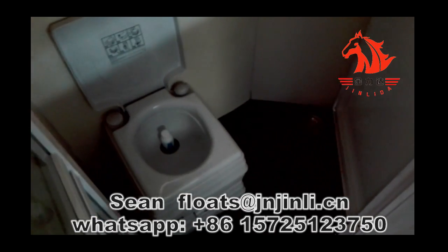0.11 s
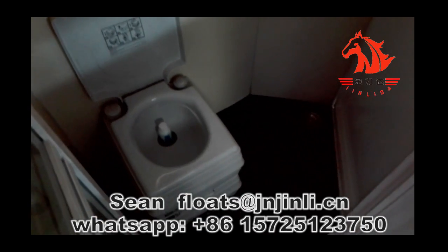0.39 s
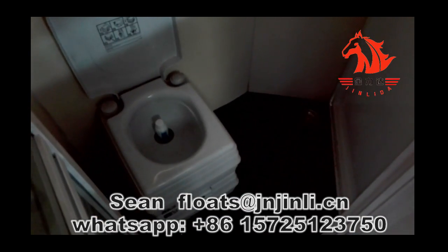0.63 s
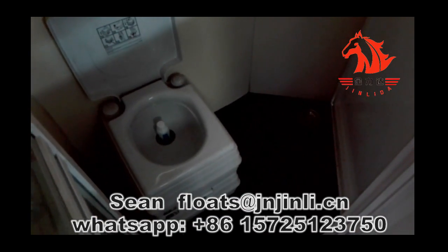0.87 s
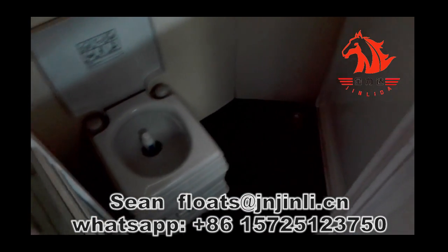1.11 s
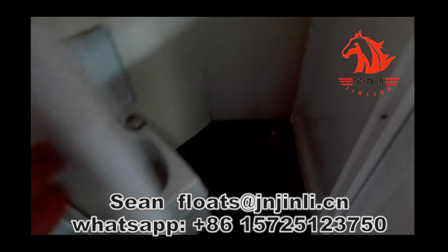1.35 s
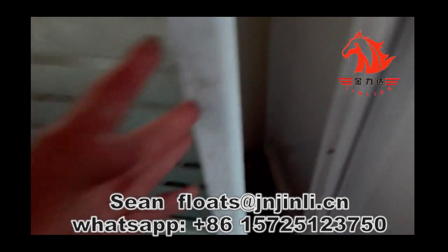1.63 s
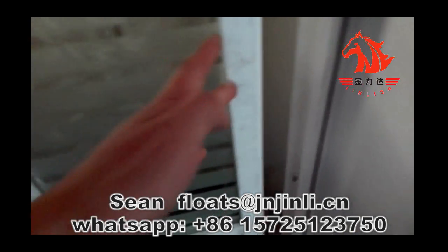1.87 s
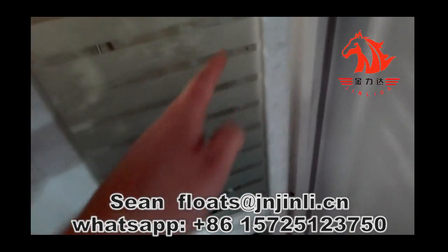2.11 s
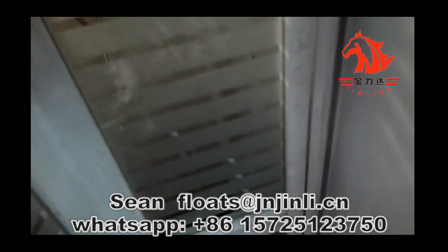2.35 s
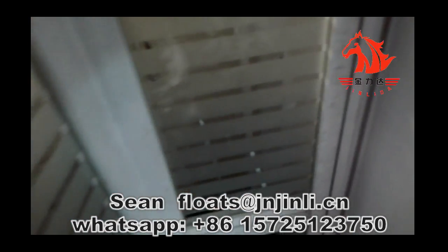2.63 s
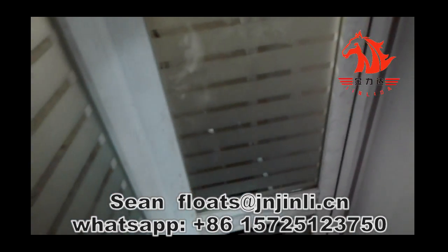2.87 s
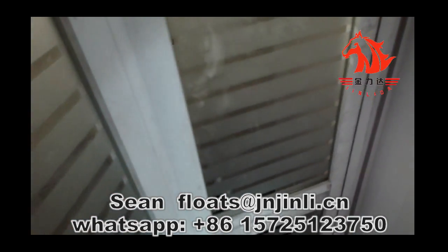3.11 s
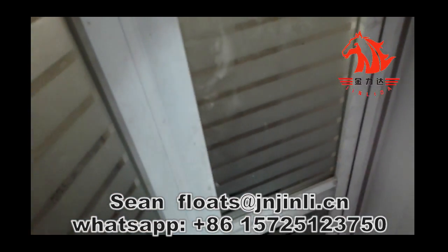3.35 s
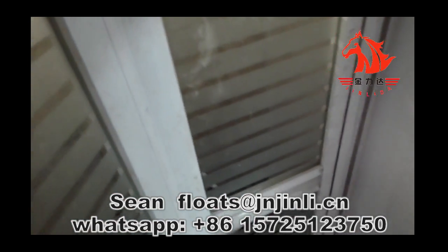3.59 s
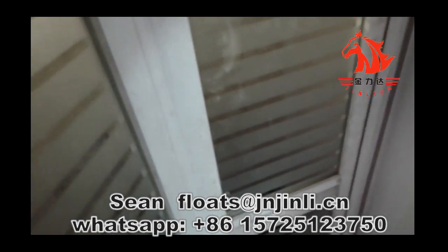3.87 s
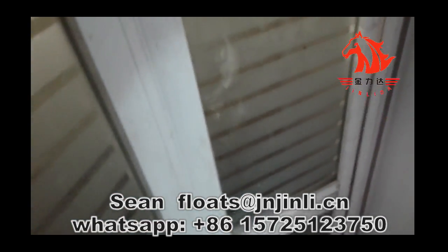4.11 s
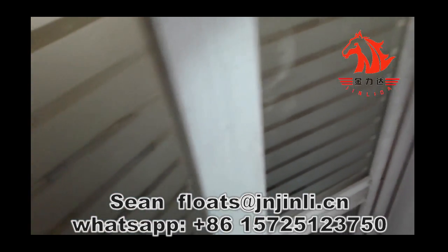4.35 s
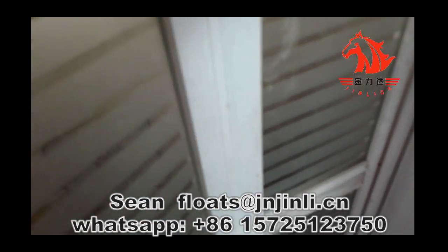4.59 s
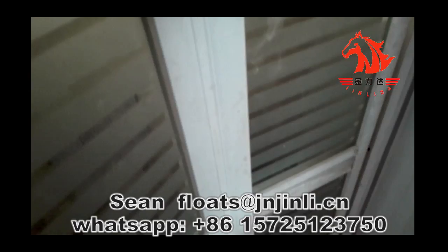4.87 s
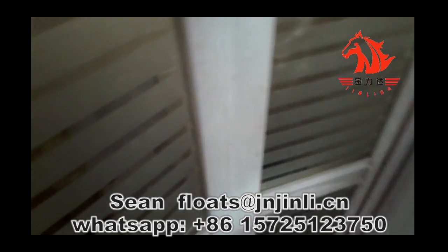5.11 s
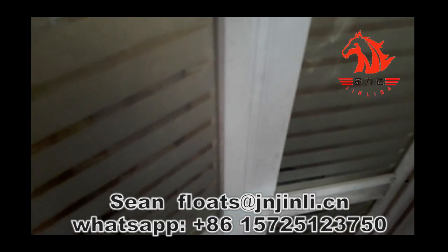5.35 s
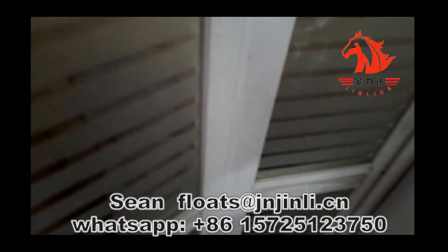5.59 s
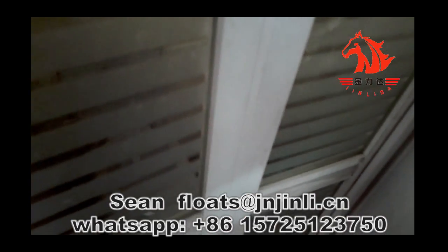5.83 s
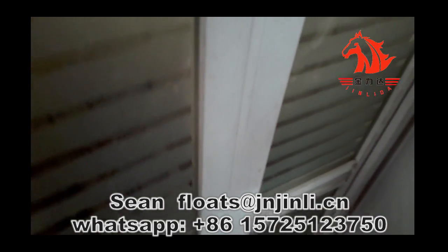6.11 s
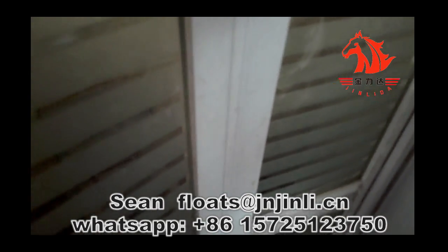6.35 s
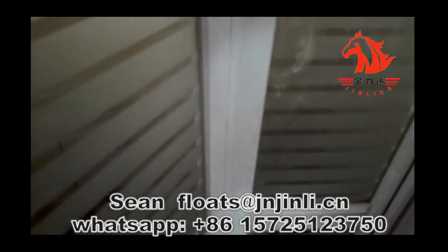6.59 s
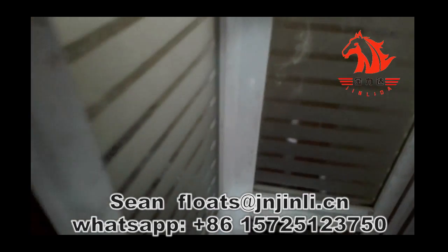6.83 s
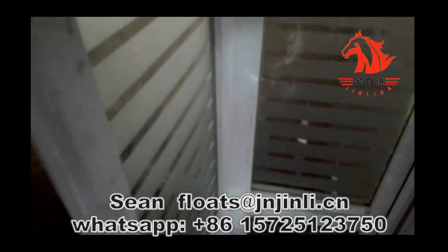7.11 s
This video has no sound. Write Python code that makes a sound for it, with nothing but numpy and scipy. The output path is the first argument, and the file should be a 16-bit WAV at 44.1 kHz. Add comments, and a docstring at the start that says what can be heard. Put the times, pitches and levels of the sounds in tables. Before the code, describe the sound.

Close, dry sound inside a small trailer cabin, with low shell rumble and very faint hiss. At 0 s a thin metal part rings faintly, high and trembling, fading by about 0.8 s; small clicks come near 0.6 and 0.9-1.0 s. From 1.1 s rollers start, and at 1.37 s a clack begins a fast, gritty slide with a hollow rolling tone and slight metallic singing. Knocks at 2.05 and 2.24 s lead to a dense, loud clatter at 2.34-2.67 s, the scrape swelling around 2.4 s. Softer rubbing continues from 3 s with light knocks at 3.5 and 3.9 s. A very short, high squeak chirps at 4.0 s. At 4.32 s the door bangs shut, by far the loudest event, slightly overloaded, with deep thump and brief rattle. Near quiet follows, a soft roller bump at 5.05 s, then light taps around 5.9-6.4 s and scuffs with small clacks from 6.75 to 7.2 s.

```python
"""A light sliding door of metal frame and panels is pushed about inside a small trailer cabin.
Its rollers and grit in the track are shaped noise; blows ring panel, frame and shell and leave a noisy rattle.
It squeaks once by stick-slip, with a little reverberation from the cabin, and bangs shut.
At first some thin metal part nearby still rings out as trembling partials; the cabin shell rumbles below.
The two channels differ a little in the treble."""
import sys
import numpy as np
from scipy import signal
from scipy.fft import rfft, irfft, next_fast_len
from scipy.io import wavfile

SR = 44100
rng = np.random.default_rng(int(sys.argv[2]) if len(sys.argv) > 2 else 0)


def makeup_ratio(level_db):
    """Linear amplitude ratio for a level in decibels (20 dB per factor of ten)."""
    decades = np.asarray(level_db, float) / 20
    return 10 ** decades


def file_out(sig):
    """Save sig as 16-bit WAV at sys.argv[1]."""
    # one column per channel
    cols = np.atleast_2d(sig).T
    # limit, then scale
    lim = np.clip(cols, -1, 1)
    pcm = np.round(lim * 32767).astype(np.int16)
    wavfile.write(sys.argv[1], SR, pcm)


N = 318402

# thin metal part, its partials: pitch_hz, tremble_hz, level_db (relative)
RINGING_PARTIALS = [(673, 15, -17), (775, 15, -16), (1023, 20, -17), (2186, 15, -13), (2692, 14, -8),
                    (3600, 40, -19), (5071, 40, -21), (5394, 25, -14), (6907, 120, -8), (7267, 40, 0),
                    (7434, 80, -11), (8000, 25, -9), (8172, 25, -14), (8672, 30, -22), (9259, 20, -18),
                    (11170, 30, -29), (13100, 30, -31)]
# its dying away: start_s, level_db
RINGING_LEVEL = [(0, -55), (.08, -54.5), (.35, -58.5), (.6, -63), (.75, -80), (.95, -100)]
# rumble of the cabin shell: start_s, level_db
SHELL_RUMBLE = [(0.0, -40), (.8, -40.5), (1.15, -35), (1.93, -45), (2.57, -31.5), (2.87, -38),
                (4.22, -42.5), (4.5, -25.5), (5.19, -46.5), (5.67, -49), (6.15, -39), (6.71, -48.5),
                (7.22, -43.5)]
# spectrum of that rumble: pitch_hz, level_db (per Hz, relative)
RUMBLE_COLOUR = [(11, -35), (18, 4.5), (59, 8), (70, 2), (86, -17), (110, -17), (140, -40), (240, -120)]
# door panel scraping in its track, and rattling after the blows near 2.4 s: start_s, level_db
FRICTION = [(0, -50.5), (.12, -63), (.88, -68), (.97, -59.5), (1.27, -53.5), (1.345, -44), (1.375, -36.5),
            (1.87, -38.5), (2.0, -43), (2.08, -37), (2.19, -43.5), (2.27, -35.5), (2.42, -22.5),
            (2.55, -33.5), (2.76, -50.5), (2.95, -57), (3.15, -41), (3.24, -52), (3.44, -57), (4.15, -52),
            (4.28, -46), (4.55, -52.5), (4.75, -67), (5.55, -70.5), (5.74, -47), (5.82, -62.5), (6.1, -57),
            (6.72, -59), (6.8, -46), (6.92, -45.5), (7.05, -56), (7.22, -49)]
# low roller noise in the track: start_s, level_db (about which it drifts)
ROLLERS = [(0, -46), (.14, -51.5), (.75, -59), (1.12, -45.5), (1.87, -37), (2.2, -43), (2.52, -30.5),
           (2.95, -51), (3.15, -41.5), (3.26, -52.5), (4.3, -48), (4.55, -41), (4.75, -62.5), (5.02, -65),
           (5.08, -40), (5.2, -57), (5.55, -62.5), (5.74, -48), (6.1, -45), (6.7, -58.5), (6.8, -36),
           (6.95, -45), (7.22, -42)]
# grit above or below the level that follows the scrape: start_s, level_db
GRIT_BRIGHTNESS = [(0, 4), (1.0, 0.5), (1.3, -10.5), (1.42, 3.5), (2.2, 3), (2.42, 1), (2.9, -4),
                   (3.2, 3.5), (3.45, -2), (3.8, -10), (4.15, 3.5), (4.32, -2.5), (6.6, -2.5), (7.05, 5),
                   (7.22, -1)]
# spectrum of the track noise: pitch_hz, level_db (per Hz, relative within rollers, panel and grit)
SCRAPE_COLOUR = [(90, -5.5), (150, 10.5), (240, -3.5), (400, -15.5), (605, -14.5), (900, -9), (1400, -6.5),
                 (1900, -9.5), (2500, -21.5), (4300, -30), (7000, -31), (9500, -43), (13500, -57.5),
                 (15000, -70.5)]
# resonances of the door panel: pitch_hz, level_db (halved in use), t60_s (scraped; shorter after a blow)
PANEL = [(1040, -9, 0.11), (1150, -5.5, 0.22), (1330, -8, 0.42), (1735, 1, 0.43), (2020, -5, 0.12),
         (2440, -24, 0.11)]
# blows on the door, and at 1.369 s a brief scrape as the slide starts: start_s, panel_db, treble_db, thump_db
# (all before trims), clack_hz
BLOWS = [(0.936, -38, -93, -51, 1590), (1.145, -75, -83, -40, 418), (1.369, -28, -54, -34, 2370),
         (2.051, -38, -44, -25, 1800), (2.243, -28.5, -47, -51, 900), (2.341, -16.5, -24.5, -15.5, 1250),
         (2.382, -11, -33, -12.5, 1150), (2.439, -22, -27.5, -22.5, 990), (2.466, -28.5, -41, -28, 1520),
         (2.55, -23, -41.5, -31.5, 1050), (2.666, -31.5, -42, -31.5, 1210), (3.539, -51, -66, -34.5, 1250),
         (3.896, -39.5, -46, -35.5, 920), (4.322, 1.5, -10.5, -0.5, 1330), (4.409, -25, -34.5, -28, 1480),
         (4.455, -43, -43, -18.5, 1200), (4.535, -36.5, -58, -30, 1090), (5.051, -43.5, -66, -42, 411),
         (5.913, -36.5, -69.5, -66, 1190), (5.96, -24, -40.5, -32.5, 1410), (6.271, -28.5, -50, -49, 1240),
         (6.298, -43.5, -61, -53, 1220), (6.316, -42, -57.5, -62, 2680), (6.416, -37.5, -63.5, -53, 1660),
         (6.749, -38, -55, -57, 1460), (6.948, -23.5, -44, -44, 1690), (7.092, -36.5, -47.5, -44, 2360),
         (7.116, -31, -80, -42, 1090), (7.179, -30.5, -55.5, -33, 1600)]
# bright ticks of a small hard part, the first at 0.582 s a small scuff: start_s, treble_db (before trims),
# clack_hz
TICKS = [(0.582, -66, 7000), (0.932, -64.5, 7300), (1.029, -50, 1590), (6.027, -79, 6400),
         (6.062, -71.5, 6400)]
# spectrum of a blow about its levels: pitch_hz, level_db (per Hz)
BLOW_COLOUR = [(200, 3), (400, -2.5), (550, -5.5), (1000, 0), (1800, -2), (2400, -4), (4500, -4),
               (10000, -3), (13800, -11.5), (15000, -28.5)]
# decay of the rattle after a blow: pitch_hz, t60_s
RATTLE_T60 = [(200, 0.23), (1000, 0.33), (3000, 0.21), (12000, 0.24)]
# resonances of the door frame: pitch_hz, level_db (about the treble, before trims), t60_s
FRAME = [(3210, 1.5, 0.033), (3770, 2.5, 0.028), (5670, -3.5, 0.031), (6400, -11.5, 0.025)]
# resonances of the cabin shell: pitch_hz, level_db (about the thump, before trims), t60_s
SHELL = [(42, -18, 0.28), (56, -12.5, 0.049), (67.5, 0.5, 0.3), (95.5, -15, 0.5), (109, -9, 0.37),
         (138.05, -14.5, 0.34), (167.2, -12.5, 0.18), (243.4, -19.5, 0.14)]
# rollers on the fast slide: start_s, level_db
ROLLING = [(1.1, -61), (1.25, -44), (1.55, -32.5), (1.9, -36.5), (2.1, -40.5), (2.3, -64), (2.4, -80)]
# their resonances: pitch_hz, width_hz (of each pass), level_db (relative)
ROLLING_PEAKS = [(205, 360, -6.5), (307, 67, -3), (436, 76, -12.5)]
# frame singing on the fast slide, and faintly again near 6 s: start_s, level_db
FRAME_SING = [(1.34, -102), (1.37, -44.5), (1.5, -42.5), (1.8, -54.5), (1.95, -71), (5.82, -94.5),
              (5.86, -67.5), (5.95, -77.5), (6.1, -72), (6.17, -65), (6.27, -75.5)]
# its resonances: pitch_hz, width_hz (of each pass), level_db (relative)
FRAME_SING_PEAKS = [(2300, 200, -6), (3540, 170, -0.5), (4005, 200, -0.1), (4800, 260, -13),
                    (10900, 180, -27)]
# frame singing on the slow rub: start_s, level_db
RUB_SING = [(2.95, -77), (3.05, -68.5), (3.26, -54), (3.4, -56.5), (3.45, -63.5), (3.85, -60), (3.97, -50),
            (4.3, -73.5)]
# its resonances: pitch_hz, width_hz (of each pass), level_db (relative)
RUB_PEAKS = [(1200, 190, -5), (3593, 900, -5.5), (5100, 600, -3.5), (6660, 1600, 1), (8840, 1300, -8.5),
             (10900, 1600, -11)]
# the squeak: start_s, slip_hz (before jitter), level_db
SQUEAK = [(3.984, 3800, -62.5), (3.991, 3850, -16.5), (3.997, 4200, -20.5), (4.002, 4070, -23.5),
          (4.007, 3840, -14), (4.018, 4136, -22.5), (4.035, 3875, -23.5), (4.045, 3896, -35.5),
          (4.06, 3900, -59.5)]
# its harmonics: multiple, level_db (relative)
SQUEAK_OVERTONES = [(1, -0.5), (2, -5.5), (3, -11.5), (4, -22)]


def rms_one(x):
    """Scales a signal to an rms of 1."""
    return x / np.sqrt(np.mean(x ** 2) + 1e-20)


def in_time(rows, outside=None):
    """Draws straight lines between timed rows, one curve per column."""
    s, *columns = np.transpose(rows)
    return [np.interp(np.arange(N) / SR, s, c, outside, outside) for c in columns]


def at_hz(points, hz):
    """Reads a curve over pitch, straight on a log axis."""
    return np.interp(np.log(hz), np.log(np.array(points)[:, 0]), np.array(points)[:, 1])


def drift(rate_hz):
    """Random wander of rms 1, computed at every 40th sample."""
    r = np.exp(-80 * np.pi * rate_hz / SR)
    noise = rng.standard_normal(N // 40 + 2002)
    slow = signal.lfilter([1], [1, -2 * r, r * r], noise)[2000:]     # past the start-up
    return np.interp(np.arange(N) / 40, np.arange(len(slow)), rms_one(slow))


def ring(clicks, hz, t60):
    """A resonance: a unit click sets a decaying sine of height 1 ringing."""
    r, w = makeup_ratio(-60 / (t60 * SR)), 2 * np.pi * hz / SR
    return signal.lfilter([0, np.sin(w)], [1, -2 * r * np.cos(w), r * r], clicks + 1e-18)


def die(clicks, t60):
    """Envelope that jumps at each click and decays exponentially."""
    return signal.lfilter([1], [1, -makeup_ratio(-60 / (t60 * SR))], clicks)


def bands(low_hz, high_hz, count):
    """Band centres and band-passed noises; neighbours are unrelated."""
    edges = np.geomspace(low_hz, high_hz, count + 1)
    white = rng.standard_normal((2, N + SR // 2))
    for k in range(count):
        sos = signal.butter(2, edges[k:k + 2], "band", fs=SR, output="sos")
        yield np.sqrt(edges[k] * edges[k + 1]), signal.sosfilt(sos, white[k % 2])[SR // 2:]


def ringing():
    """The thin metal part: partials whose pitch trembles within their width."""
    out = np.zeros(N)
    for hz, width_hz, db in RINGING_PARTIALS:
        turns = 2 * np.pi * np.cumsum(hz + width_hz * drift(250)) / SR
        out += makeup_ratio(db + 2 + 4 * drift(14)) * np.sin(turns)
    return makeup_ratio(in_time(RINGING_LEVEL, -130)[0]) * out


def rumble(level_db, lumpy_db):
    """The cabin shell shudders under feet and hands: low noise of wandering level."""
    noise = sum(makeup_ratio(at_hz(RUMBLE_COLOUR, hz)) * band for hz, band in bands(29, 110, count=9))
    return makeup_ratio(level_db) * rms_one(noise * makeup_ratio(lumpy_db * drift(2.7)))


def scrape(roller_db, scrape_db, grit_db, patchy_db=3.0, gritty_db=1.5):
    """Friction noise in the track: rollers below, panel in the middle, grit above."""
    parts, grain = np.zeros((3, N)), drift(55)
    for hz, band in bands(90, 14230, count=40):
        zone = int(hz > 520) + int(hz > 2400)
        parts[zone] += band * makeup_ratio(at_hz(SCRAPE_COLOUR, hz) + patchy_db * drift(5) + gritty_db * grain)
    rubbed = rms_one(parts[1])
    resonance = sum(makeup_ratio(db / 2) * ring(rubbed, hz, t60) for hz, db, t60 in PANEL)
    parts[1] = rubbed + 0.29 * rms_one(resonance)
    return sum(makeup_ratio(db) * rms_one(part) for db, part in zip((roller_db, scrape_db, grit_db), parts))


def blows():
    """Each blow or tick cracks, rings panel, frame and shell and leaves a rattle."""
    rows = []
    for s, panel, treble, thump, hz in BLOWS:
        # the top octave rises faster than the treble and is weaker on light taps
        top = -57.5 + 1.67 * (treble + 40) - 0.95 * max(panel - thump, 0)
        rows.append((s, panel, treble, top, thump, hz))
    rows += [(s, treble + 6, treble, treble + 4.5, treble - 15, hz) for s, treble, hz in TICKS]
    s, panel_db, treble_db, top_db, thump_db, clack_hz = np.transpose(sorted(rows))
    light_db = np.maximum(panel_db - thump_db, 0)     # a light tap has little thump under its panel
    at, out = (s * SR).astype(int), np.zeros(N)

    def train(db):
        clicks = np.zeros(N)
        clicks[at] = makeup_ratio(db)
        return clicks

    def luck(spread_db):
        return rng.normal(0, spread_db, len(at))

    for hz, band in bands(200, 14550, count=32):
        # blend of panel, treble and top levels, anchored at three pitches
        shares = [at_hz(list(zip((2000, 4500, 10000), row)), hz) for row in np.eye(3)]
        db = np.dot(shares, [panel_db - 2.0, treble_db + 7.5, top_db - 1.0])
        db += at_hz(BLOW_COLOUR, hz) + luck(2.8)
        db += 8 * np.exp(-(np.log(hz / clack_hz) / 0.14) ** 2)     # the part that is hit stands out
        rattle = die(train(db), at_hz(RATTLE_T60, hz)) * makeup_ratio(2.0 * drift(36))
        crack = die(train(db + 3.5 + 0.2282 * light_db), t60=0.025)     # light taps crack more
        build = np.exp(-hz / 3.7 / SR)     # both build up over a few cycles
        out += band * signal.lfilter([1 - build], [1, -build], rattle + crack)

    panel = sum(ring(train(panel_db + db / 2 - 24.0 + luck(5)), hz, t60 * 0.66) for hz, db, t60 in PANEL)
    out += signal.sosfilt(signal.butter(2, 2600, fs=SR, output="sos"), panel)

    # light taps ring the frame most
    frame_db = treble_db - 4.5 + 0.79 * np.minimum(light_db, 12)
    out += sum(ring(train(frame_db + db + luck(3)), hz, t60) for hz, db, t60 in FRAME)

    # the shell jumps inward at once and first draws air away from the microphone
    push = np.zeros(N)
    for hz, db, t60 in SHELL:
        swing = ring(train(thump_db + db + 3.0 + luck(1.1)), hz, t60)
        push += np.gradient(swing) * SR / (2 * np.pi * hz)
    return out - signal.sosfilt(signal.butter(2, 190, fs=SR, output="sos"), push)


def sing(level, peaks):
    """Rollers or frame singing under friction: noise twice through each resonance."""
    out = np.zeros(N)
    for hz, width_hz, db in peaks:
        t60 = np.log(1000) / np.pi / width_hz
        once = ring(rng.standard_normal(N), hz, t60)
        out += makeup_ratio(db + 1.9 * drift(23)) * rms_one(ring(once, hz, t60))
    return makeup_ratio(in_time(level, -130)[0]) * out


def squeak(jitter, rough_db, rasp):
    """Stick-slip at some thousand slips a second, uneven in rate and size."""
    hz, level_db = in_time(SQUEAK)
    turns = 2 * np.pi * np.cumsum(hz * (1 + jitter * drift(300))) / SR
    tone = sum(makeup_ratio(db + rough_db * drift(170)) * np.sin(k * turns) for k, db in SQUEAK_OVERTONES)
    low_pass = signal.butter(4, 650, fs=SR, output="sos")
    uneven = rms_one(signal.sosfilt(low_pass, rng.standard_normal(N)))
    return tone * (1 + rasp * uneven) * makeup_ratio(level_db) * (level_db > -59)     # silent below -59 dB


def cabin(x, t60_s=0.49, wall_cut_hz=4900):
    """Reverberation between the walls: ten feedback delays, duller on every round."""
    size = next_fast_len(N + SR)
    turn = np.exp(-2j * np.pi * np.arange(size // 2 + 1) / size)     # one sample of delay
    dull, walls = np.exp(-2 * np.pi * wall_cut_hz / SR), 0
    for k, lag in enumerate((rng.uniform(.005, .02, 10) * SR).astype(int)):
        loop = makeup_ratio(-60 * lag / SR / t60_s) * (1 - dull) / (1 - dull * turn) * turn ** lag
        walls = walls + (-1) ** k * loop / (1 - loop)
    return irfft(rfft(x, size) * walls, size)[:N]


def scene():
    """Door, thin metal part and cabin shell together, the same in both channels."""
    scrape_db, = in_time(FRICTION)
    roller_db = in_time(ROLLERS)[0] + 4 * drift(11.0)
    # the grit follows 0.8 of the scrape's swing about -50 dB
    grit_db = -58.5 + 0.8 * (scrape_db + 50) + in_time(GRIT_BRIGHTNESS)[0]
    slip = squeak(jitter=.042, rough_db=2.0, rasp=.52)
    door = blows() + scrape(roller_db, scrape_db, grit_db) + slip + makeup_ratio(-15.5) * cabin(slip)
    door += sing(FRAME_SING, FRAME_SING_PEAKS) + sing(RUB_SING, RUB_PEAKS) + sing(ROLLING, ROLLING_PEAKS)
    both = door + ringing() + rumble(in_time(SHELL_RUMBLE)[0], lumpy_db=3.5)
    both += makeup_ratio(-80.0) * rng.standard_normal(N)     # faint hiss of the air and the input
    return np.array([both, both])


def top_cut(x):
    """Nothing passes above the cut-off."""
    return signal.sosfilt(signal.butter(12, 15590, fs=SR, output="sos"), x)


def record(dry):
    """The top is cut, the loudest blow overloads the input, the channels differ a little in the treble."""
    cut = signal.sosfilt(signal.cheby2(12, 60, 15300, fs=SR, output="sos"), dry)
    full = cut / (1 + np.abs(cut / .99) ** 6) ** (1 / 6)     # soft limit at .99
    high = signal.butter(6, 4600, "high", fs=SR, output="sos")
    # treble of randomly flipping sign, opposite in the two channels
    flipped = signal.sosfilt(high, full[0]) * np.sign(drift(300))
    side = makeup_ratio(-11) * signal.sosfilt(high, flipped)
    mix = full + side * [[1], [-1]]
    return top_cut(mix)


dry = scene()
out = record(dry)
file_out(out)
```